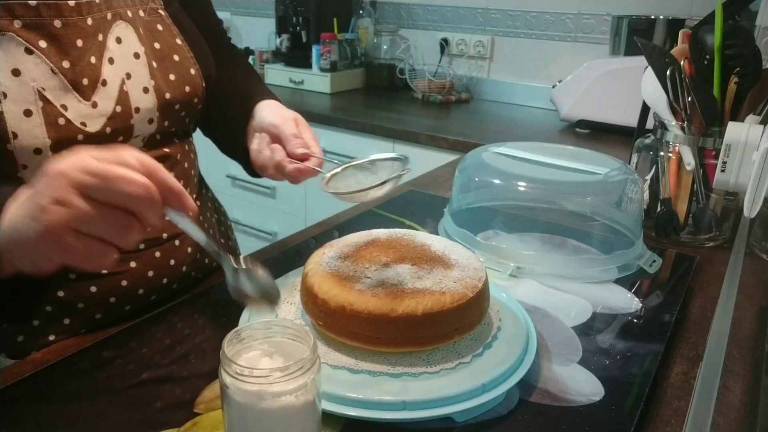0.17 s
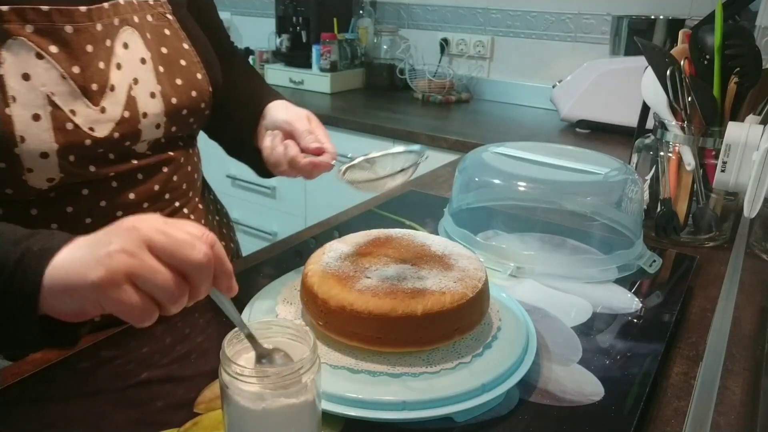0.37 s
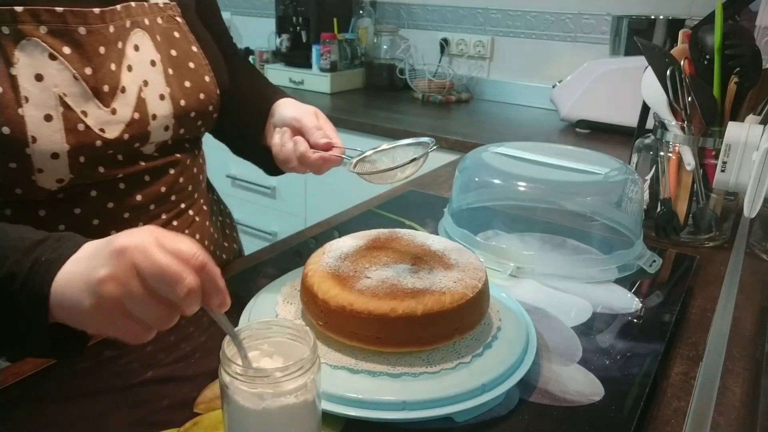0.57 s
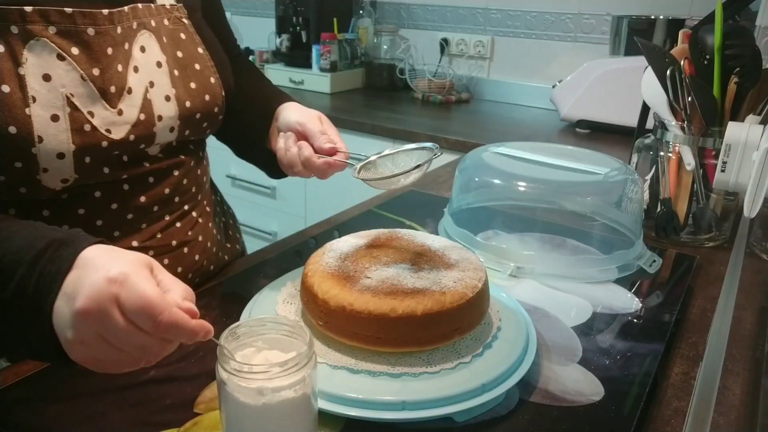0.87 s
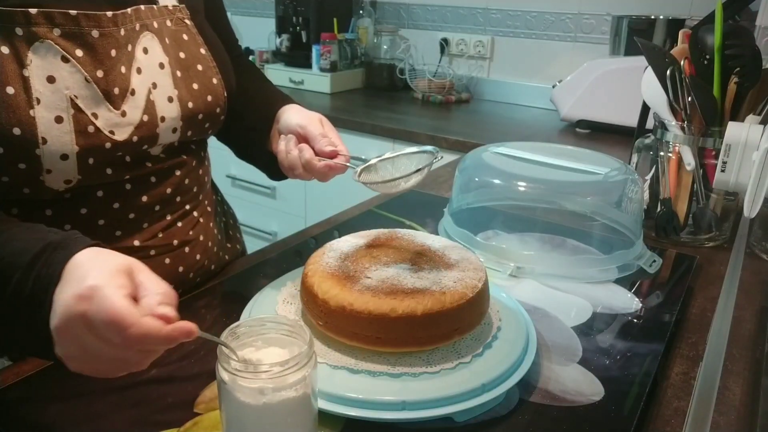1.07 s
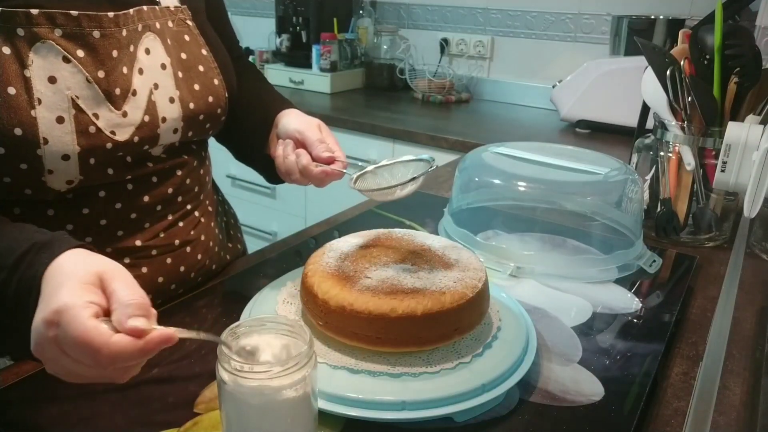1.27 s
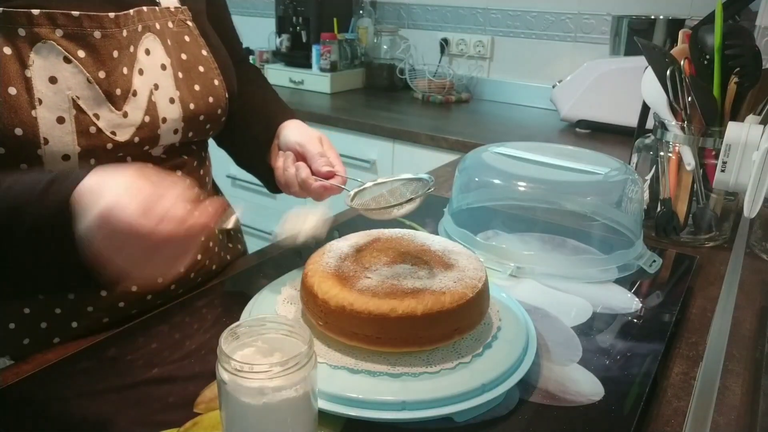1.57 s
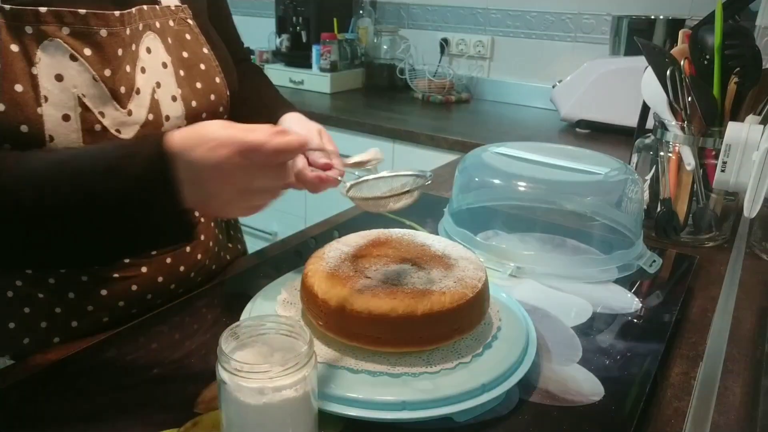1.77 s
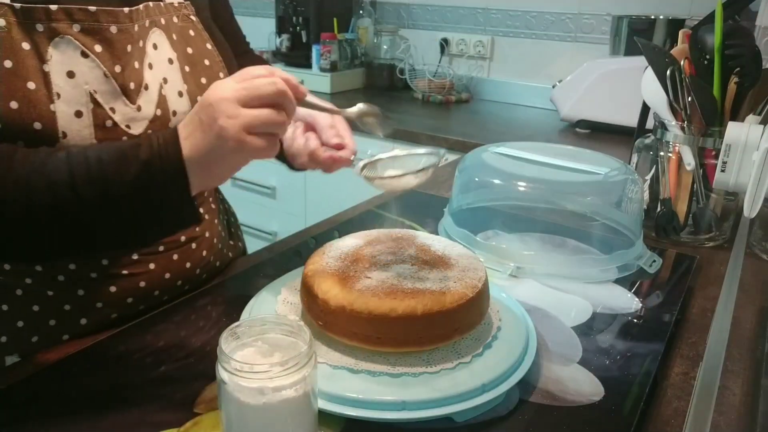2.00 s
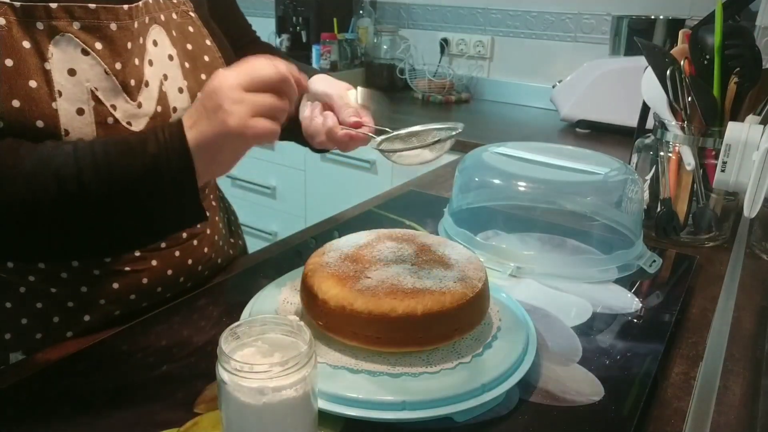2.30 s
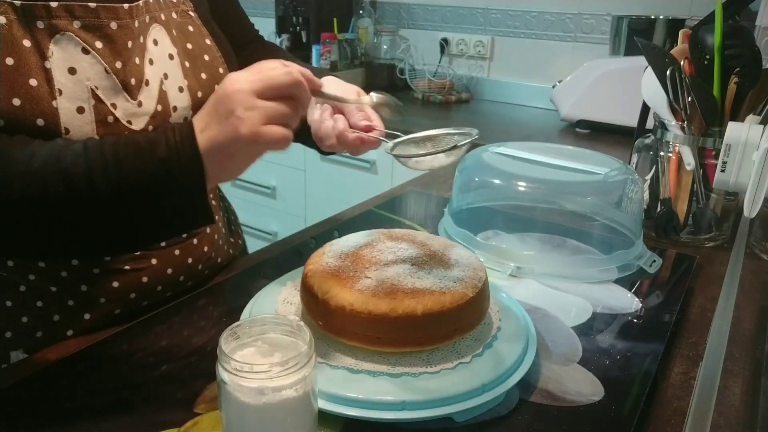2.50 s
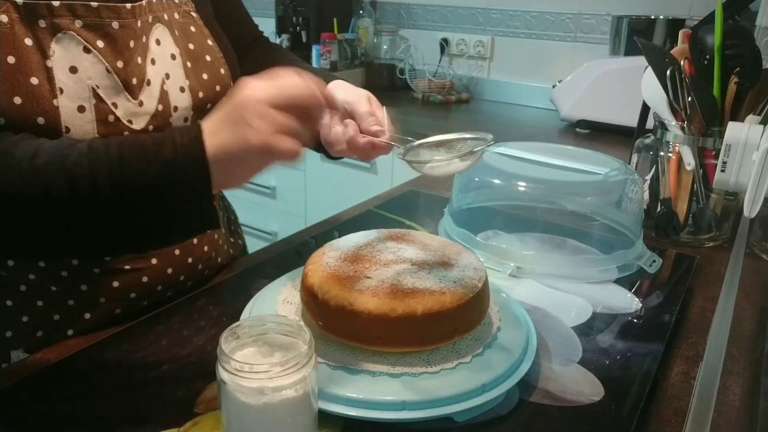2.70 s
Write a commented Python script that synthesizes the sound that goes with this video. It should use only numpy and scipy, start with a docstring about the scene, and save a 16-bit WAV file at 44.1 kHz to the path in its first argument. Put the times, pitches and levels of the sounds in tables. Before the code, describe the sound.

A spoon taps a small wire sieve in quick, bright, rattly strokes, after first crunching through powdered sugar and knocking a glass jar; close stereo microphone in a small hard kitchen with faint room noise.

```python
"""A spoon taps a small wire sieve about six times a second: short, bright chatter of metal on wire.
Before that it digs powdered sugar out of a glass jar on a kitchen counter and knocks the glass.
Random grains shaped by envelopes make chatter, crunch, rasps, brushing sleeve and sliding sugar;
dying sines ring as sieve, jar and glass. Noise bumps mark the handling, reflections and a tail the
small hard kitchen, over faint room noise and hum."""
import sys
import numpy as np
from scipy import signal
from scipy.fft import rfft, irfft
from scipy.io import wavfile

SR = 44100
rng = np.random.default_rng(int(sys.argv[2]) if len(sys.argv) > 2 else 0)


def pcm_store(signal):
    """Save signal as 16-bit PCM."""
    levels = np.round(np.clip(np.atleast_2d(signal), -1, 1) * 32767)
    wavfile.write(sys.argv[1], SR, levels.astype(np.int16).T)


N = 125685
T = np.arange(N) / SR
BLOW_SAMPLES = SR // 50  # an event's energy is spread over this span to set its rms level

# even spectrum or balance: f/Hz, level/dB
FLAT = [(100, 0), (10000, 0)]
# stereo balance of the jar: f/Hz, left over right/dB
JAR_SIDE = [(100, -0.5), (220, -1), (400, -3.5), (1200, -8), (2500, -3), (7000, -1.5), (15000, 14.5)]


def amp(db):
    """Decibels to gain."""
    return 10 ** (np.asarray(db) / 20)


def unit(x):
    """Scales a sound to energy 1."""
    return x / np.sqrt(np.sum(x ** 2) + 1e-20)


def read(points, hz):
    """Reads a spectrum on a log-frequency axis."""
    f, value = np.transpose(points)
    return np.interp(np.log(hz + 1), np.log(f + 1), value)


def through(x, response):
    """Convolves one or two channels with a response."""
    return signal.fftconvolve(np.atleast_2d(x), np.atleast_2d(response), axes=1)[:, :N]


def colour(spectrum, side=FLAT, size=4096):
    """Minimum-phase stereo response with this spectrum and left-right balance, energy 1."""
    hz = abs(np.fft.fftfreq(size, 1 / SR))
    level_db = read(spectrum, hz) + np.outer([.5, -.5], read(side, hz))
    log_gain = np.log(amp(level_db))
    # the Hilbert transform of the log gain gives the phase
    response = np.fft.ifft(np.exp(np.conj(signal.hilbert(log_gain)))).real
    return unit(response[:, :size // 2])


def ring(modes):
    """Response of a struck body: dying sines, one per mode, energy 1."""
    t = T[:SR // 2]
    return unit(sum(amp(db) * 1000 ** (-t / t60) * np.sin(2 * np.pi * hz * t) for hz, db, t60 in modes))


def grains(per_s, spread_db):
    """Random tiny contacts of uneven size and either sign."""
    size = amp(spread_db * np.minimum(rng.exponential(1, N), 3))
    return size * rng.choice([-1, 1], N) * (rng.random(N) < per_s / SR)


def swell(s, rise, fall, shape=1):
    """Envelope that rises to a peak at s and falls away."""
    return np.exp(-np.maximum((s - T) / rise, (T - s) / fall) ** shape)


def blow(s, length, rattle):
    """Hard contact: a first click and a dying rattle after it, energy 1."""
    after = np.arange(N) - round(s * SR)
    rattling = grains(2500, 2.2) * swell(s, length, length) * (after > 0)
    return unit((after == 0) + rattle * unit(rattling))


def push(s):
    """Smooth two-sided push on the jar, area 1."""
    fall_s = 0.000285
    force = np.exp(-np.abs(T - s) / fall_s)
    return force / force.sum()


def crunch(s, length):
    """Run of slips cushioned by the sugar: it builds up smoothly and dies, energy 1."""
    cushion_s = 0.009  # the slips start this long before s
    t = np.maximum(T - s + cushion_s, 0)
    build_up = 1 - np.exp(-(t / cushion_s) ** 2)
    return unit(grains(6000, 2) * build_up * np.exp(-t / length))


def pair(x):
    """Makes two unrelated channels alike in the bass, as two close microphones hear it."""
    # likeness of left and right: f/Hz, correlation
    alike = [(60, 0.87), (280, .95), (640, 0.39), (1400, 0), (15000, 0)]
    left, right = rfft(x)
    c = np.clip(read(alike, np.fft.rfftfreq(x.shape[1], 1 / SR)), -1, 1)
    return irfft(np.array([left, c * left + np.sqrt(1 - c ** 2) * right]), x.shape[1])


def kitchen(x):
    """Adds quick reflections off the counter and a room tail whose decay depends on frequency."""
    # decay of the tail: f/Hz, t60/s
    room_t60 = [(100, 0.19), (260, 0.79), (700, 0.51), (2000, 0.52), (4600, 0.59), (12000, 0.41)]
    early_db, early_fall_s, wet_db = -7, 0.024, -5.5
    t = T[:SR // 2]
    shape = (2, len(t))
    hits = rng.random(shape) < 2000 / SR  # 2000 reflections per second
    early = pair(rng.standard_normal(shape) * hits * np.exp(-t / early_fall_s))
    hz, at, bins = signal.stft(pair(rng.standard_normal(shape)), SR, nperseg=256)
    decay = 1000 ** (-at / read(room_t60, hz)[:, None])
    tail = signal.istft(bins * decay, SR, nperseg=256)[1][:, :len(t)]
    tail = tail * np.minimum(t / 0.004, 1)  # fades in over 4 ms
    room = amp(early_db) * unit(early) + amp(wet_db) * unit(tail)
    return x + np.sqrt(2) * through(x, room)


def background():
    """Quiet room noise, coloured from two noise channels, and a mains hum as one sine."""
    # room noise: f/Hz, level/dB
    floor = [(25, -56), (60, -18.5), (100, 6), (135, -8.5), (220, -11.5), (320, -13), (450, -22),
             (850, -18), (1300, -22), (4000, -23), (7500, -26.5), (15500, -24.5)]
    floor_db, hum_hz, hum_db = -67, 101, -74
    air = through(pair(rng.standard_normal((2, N))), colour(floor))
    hum = np.sin(2 * np.pi * hum_hz * T)
    return np.sqrt(2) * (amp(floor_db) * air + amp(hum_db) * hum)


def bumps():
    """Dull bumps as the hands shift on spoon and sieve: short swells of band-passed noise."""
    # bumps: t/s, level/dB, rise/s, fall/s, f/Hz
    rows = [(0.046, -63, 0.0084, 0.011, 98), (1.96, -57.5, 0.15, 0.032, 242),
            (2.029, -48.5, 0.028, 0.047, 138), (2.085, -51, .025, 0.05, 85),
            (2.18, -55.5, 0.014, 0.039, 100)]
    ratio = 1.43  # from the pitch to either band edge
    out = np.zeros(N)
    for s, db, rise, fall, hz in rows:
        band = signal.butter(2, [hz / ratio, hz * ratio], "bandpass", fs=SR, output="sos")
        noise = signal.sosfilt(band, rng.standard_normal(N))
        out += amp(db) * unit(noise * swell(s, rise, fall, 0.59))
    return out / np.sqrt(2)


def rubs(rows, spectrum, per_s, spread_db):
    """Soft friction: strokes of dense fine grains, drawn apart for left and right."""
    def strokes():
        """One channel of grains under the stroke envelopes."""
        return sum(amp(db) * unit(grains(per_s, spread_db) * swell(s, rise, fall, 2.07))
                   for s, db, rise, fall in rows)
    return through(pair(np.array([strokes(), strokes()])), colour(spectrum))


def brushing():
    """Soft brushing of sleeve and spoon: very dense, uneven grains."""
    # strokes: t/s, level/dB, rise/s, fall/s
    rows = [(.015, -54.5, 0.016, 0.045), (.285, -47.5, 0.021, 0.055), (1.176, -47, 0.028, 0.057),
            (1.595, -59.5, 0.034, 0.037), (1.985, -53, 0.05, 0.025)]
    # cloth tone: f/Hz, level/dB
    cloth = [(60, -30), (300, -22), (800, -8.5), (1400, -12.5), (2500, -10), (4000, -3), (6000, -9.5),
             (9000, -9.5), (15000, -32.5)]
    return rubs(rows, cloth, 12000, 7.5)


def sliding():
    """Sugar slides off the spoon: bright, even grains."""
    # slides: t/s, level/dB, rise/s, fall/s
    rows = [(.275, -51, 0.013, 0.019), (.345, -59.5, 0.026, 0.016), (.462, -51, 0.033, 0.005),
            (1.09, -67, 0.026, 0.004), (1.792, -69, 0.0064, 0.012), (1.836, -52, 0.013, .015)]
    # powder tone: f/Hz, level/dB
    powder = [(1500, -9), (4000, -3), (7000, -1), (9500, 11.5), (12500, 10.5), (15500, 4)]
    return rubs(rows, powder, 6000, 2.6)


def digging():
    """The spoon pushes through sugar: a steady run of grains follows a drawn level curve."""
    # digging level: t/s, level/dB
    curve = [(.30, -92), (.35, -47.5), (.39, -58), (.42, -54.5), (.475, -44), (.52, -70), (.57, -45.5),
             (.63, -52.5), (.67, -52.5), (.73, -55), (.78, -53.5), (.82, -54.5), (.86, -43), (.90, -89),
             (.95, -50), (1.0, -86), (1.10, -92)]
    level = amp(np.interp(T, *np.transpose(curve), left=-120, right=-120))
    return unit(grains(1200, 1.5)) * np.sqrt(N / BLOW_SAMPLES) * level


def squeaks():
    """Steel squeaks on glass: a brief sine whose phase wanders at random."""
    # squeaks: t/s, f/Hz, level/dB, length/s
    rows = [(0.656, 1795, -57, 0.0089)]
    waver = np.cumsum(0.054 * rng.standard_normal(N))  # rad
    return sum(amp(db) * unit(swell(s, length, length, 2) * np.sin(2 * np.pi * hz * T + waver))
               for s, hz, db, length in rows)


def rasps():
    """Steel rasps on glass: gritty slips coloured around a pitch."""
    # rasps: t/s, level/dB, rise/s, fall/s, pitch/Hz
    rows = [(0.7, -54, 0.0043, 0.0056, 3800), (.762, -54.5, .003, 0.009, 3300),
            (.792, -55, 0.022, 0.031, 3300), (0.862, -45.5, 0.017, 0.011, 2800),
            (.972, -67, 0.0034, 0.013, 2520)]
    # rasp tone: multiple of the pitch, level/dB
    tone = [(.25, -10), (.65, 8.5), (1, 10), (1.45, -2), (2.4, -3.5), (4.5, -18)]
    out = np.zeros((2, N))
    for s, db, rise, fall, hz in rows:
        slips = amp(db) * unit(grains(2500, 1.5) * swell(s, rise, fall, 1.7))
        out += through(slips, colour([(hz * k, level) for k, level in tone], JAR_SIDE))
    return out


def jar():
    """The spoon digs, rasps and knocks in the jar; contacts excite counter and glass modes."""
    # spoon against the jar: t/s, thump/dB, clack/dB, length/s, glass ring/dB
    knocks = [(0.375, -36.5, -41.5, 0.009, -58), (0.383, -36, -37.5, .012, -69),
              (0.481, -30, -45, 0.015, -63), (0.554, -31, -47.5, 0.014, -65), (0.762, -38, -48, 0.013, -58),
              (0.862, -40, -39.5, 0.004, -52.5), (0.976, -36.5, -50.5, 0.0043, -58),
              (1.230, -38.5, -40, 0.01, -41.5)]
    # jar on the counter: f/Hz, level/dB, t60/s
    jar_modes = [(96.3, -9, 0.17), (154, -6.5, 0.11), (213.8, 8.5, 0.077), (238.1, -1.5, 0.3),
                 (278.6, -3, 0.12), (339.7, -2.5, 0.19), (379, -3, 0.029), (601.6, -6, 0.084),
                 (655, -16, 0.26), (798, -2, 0.12), (919.7, -3, 0.14), (1119, -14, 0.21)]
    # wall of the jar: f/Hz, level/dB, t60/s
    glass_modes = [(784, 4, 0.11), (915, 8.5, 0.14), (1048, 5, 0.053), (1093, 5.5, 0.15), (2160, -4, 0.23),
                   (2200, -5, 0.29), (2810, -9.5, 0.13), (4080, -13, 0.31)]
    # clack tone: f/Hz, level/dB
    clack_tone = [(60, -60), (160, 4.5), (380, 3), (680, -4.5), (950, 0.5), (1150, -12.5), (1300, -10),
                  (2200, -12), (4000, -26.5), (8000, -31), (15000, -39)]
    # tone of the crunching sugar: f/Hz, level/dB
    crunch_tone = [(80, 1.5), (250, 3), (950, -9), (1300, -4.5), (1800, -11), (3000, -16.5), (7000, -25),
                   (12000, -21), (15500, -36)]
    dig_body_db, body_room_db, build_s, low_cut_hz = 2, -9.5, 0.0039, 78
    thump = sum(amp(db) * push(s) for s, db, _, _, _ in knocks)
    clack = sum(amp(db) * crunch(s, length) for s, _, db, length, _ in knocks)
    clink = sum(amp(db) * blow(s, length, 0.19) for s, _, _, length, db in knocks)
    dig = digging()
    # the body on the counter takes a moment to build up
    counter = unit(ring(jar_modes) * (1 - np.exp(-T[:SR // 2] / build_s)))
    body = through(thump + amp(dig_body_db) * dig, counter)
    body = body + through(clink, ring(glass_modes)) + squeaks()
    body = through(body, colour(FLAT, JAR_SIDE))
    grit = through(clack, colour(clack_tone, JAR_SIDE)) + through(dig, colour(crunch_tone, JAR_SIDE))
    grit = grit + rasps()
    sound = body + kitchen(grit + amp(body_room_db) * body)
    low_cut = signal.butter(2, low_cut_hz, "highpass", fs=SR, output="sos")
    return signal.sosfilt(low_cut, sound)


def sieve(count=3):
    """The spoon chatters over several wires, each with its own path through the room, and knocks the rim."""
    # spoon on sieve: t/s, chatter/dB, rise/s, fall/s, rim knock/dB, left over right/dB
    taps = [(2.045, -25.5, 0.0076, 0.0089, -39, 2), (2.208, -19.5, 0.0078, 0.0057, -35, 3),
            (2.363, -17, 0.01, .011, -33.5, 3.5), (2.531, -17.5, 0.0088, 0.0057, -33.5, 3.5),
            (2.695, -18, 0.0076, 0.014, -33.5, 3), (2.862, -24, 0.0086, 0.014, -19, -1)]
    # wire mesh: f/Hz, level/dB
    mesh = [(150, -49), (450, -34), (1100, -32), (1950, -21), (2450, -25.5), (2750, -13), (3250, -10),
            (3650, -24.5), (4100, -12), (4550, -16), (4950, -32), (5400, -11.5), (8300, -13), (10400, -1),
            (11900, -0.5), (13800, -8.5), (15500, -11.5)]
    # stereo balance of the sieve: f/Hz, left over right/dB
    mesh_side = [(200, -7.5), (1500, -6), (3200, -4), (7000, -5), (9500, -1.5), (12000, 1.5), (15000, 2)]
    # sieve frame and spoon: f/Hz, level/dB, t60/s
    sieve_modes = [(2838, 3.5, 0.07), (3000, 0, 0.047), (4220, -3, .08), (6990, -25, .08),
                   (9540, -5, 0.094), (10170, 8.5, 0.14), (11000, -11, 0.14), (10140, -6, 0.086),
                   (11204, -18, .12), (11800, -15, .1), (11100, -2, .1), (13600, -5, 0.15)]
    # rim knock: f/Hz, level/dB
    rim = [(30, -35), (130, -27), (430, -12), (1100, -29.5), (2000, -11), (3100, 2.5), (3700, -5),
           (4300, -31), (5000, -33), (6000, -14), (15000, -5.5)]
    graze_db, graze_s = -26.5, 0.028  # the spoon grazes the wire lightly around each tap
    rattle_db, rattle_s = -20.5, 0.03  # the loose mesh rattles on after each tap
    ring_db, rim_fall_s = -18, 0.0048
    chatter = np.zeros((2, N))
    for _ in range(count):
        contacts, loose = grains(1400, 3.5), grains(160, 2.2)
        bursts = np.zeros((2, N))
        for s, db, rise, fall, _, side_db in taps:
            stroke = swell(s, rise, fall, 1.5) + amp(graze_db) * swell(s, graze_s, graze_s, 1.4)
            after = swell(s, rattle_s, rattle_s) * (T > s + fall)
            tap = stroke.max() * unit(contacts * stroke) + amp(rattle_db) * unit(loose * after)
            bursts += amp(db + np.array([[.5], [-.5]]) * side_db) * tap
        lag = rng.integers(4, 24)  # samples by which the right channel trails
        spaced = np.array([bursts[0], np.roll(bursts[1], lag)]) * (T > lag / SR)
        chatter += kitchen(spaced) / np.sqrt(count)
    wire = through(chatter, colour(mesh, mesh_side))
    ringing = amp(ring_db) * through(chatter, ring(sieve_modes))
    knock = sum(amp(db) * blow(s, rim_fall_s, 6.6) for s, _, _, _, db, _ in taps)
    return wire + ringing + kitchen(through(knock, colour(rim, mesh_side)))


def scene():
    """Mixes jar, soft rubbing, bumps and sieve over the background."""
    soft = kitchen(sliding() + brushing())
    events = sieve() + jar() + bumps() + soft
    return np.sqrt(BLOW_SAMPLES) * events + background()


def record(dry):
    """The recorder's band limit: a steep linear-phase low-pass."""
    edge_hz = 15520
    low_pass = signal.firwin(511, edge_hz, window=("kaiser", 9), fs=SR)
    return signal.oaconvolve(dry, low_pass[None], "same")


dry = scene()
out = record(dry)
pcm_store(out)
```